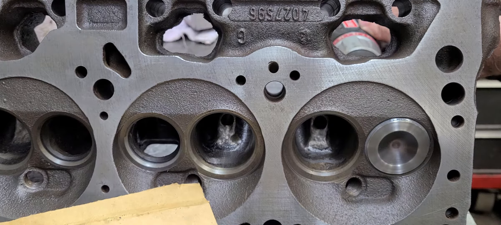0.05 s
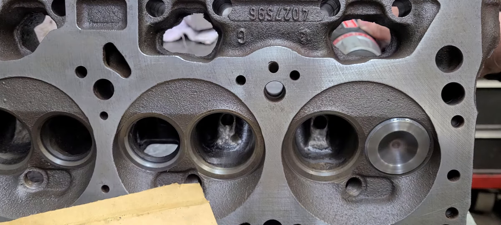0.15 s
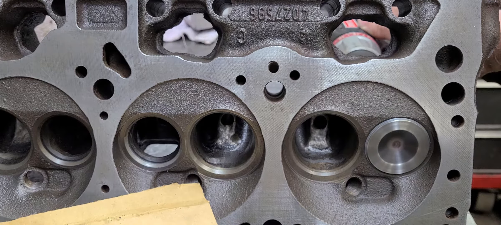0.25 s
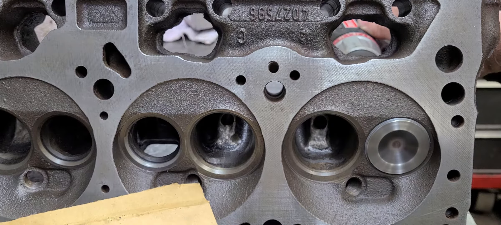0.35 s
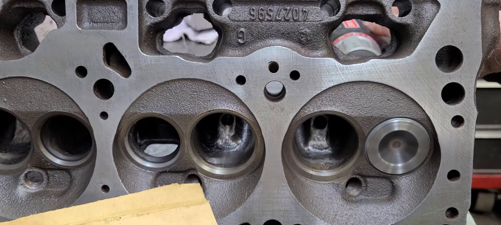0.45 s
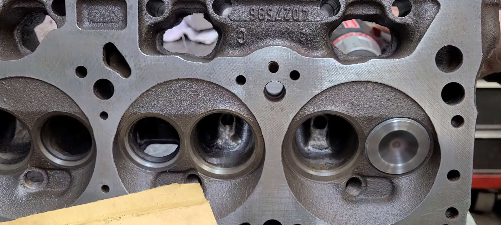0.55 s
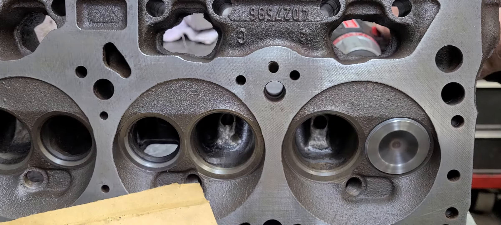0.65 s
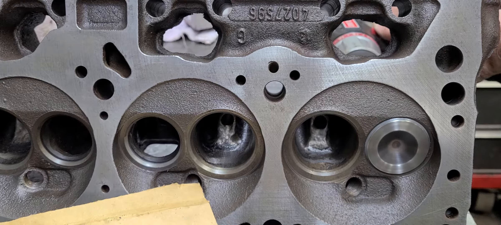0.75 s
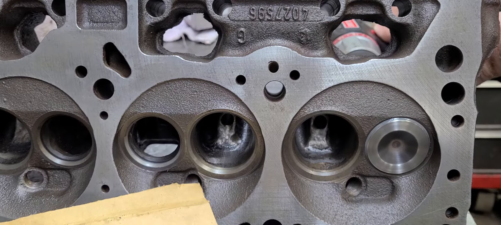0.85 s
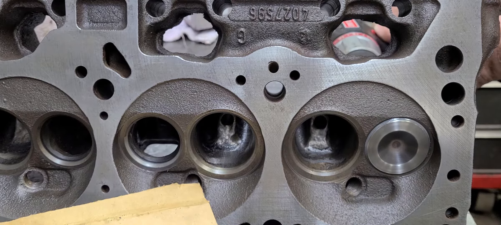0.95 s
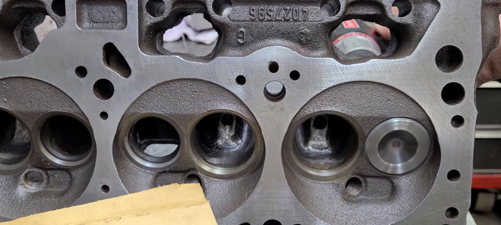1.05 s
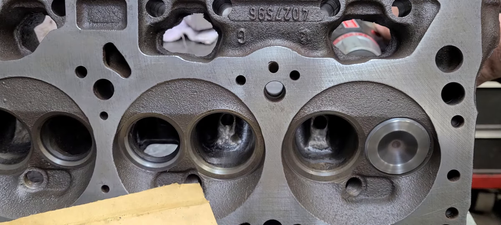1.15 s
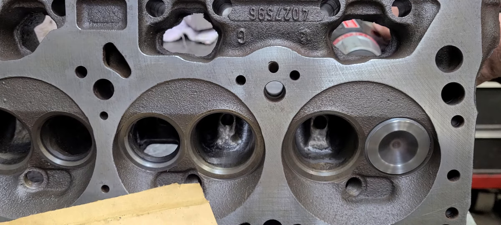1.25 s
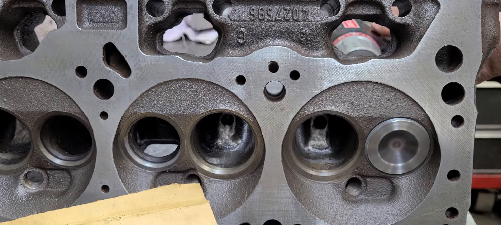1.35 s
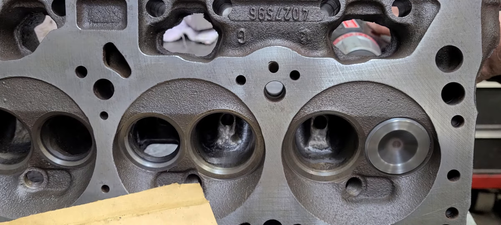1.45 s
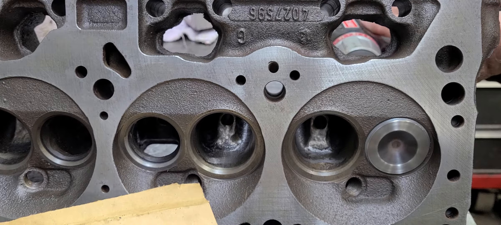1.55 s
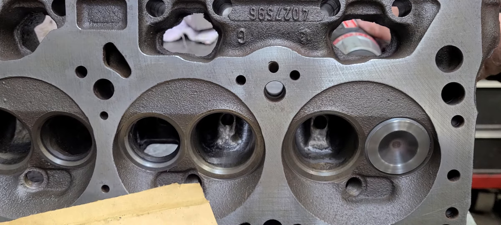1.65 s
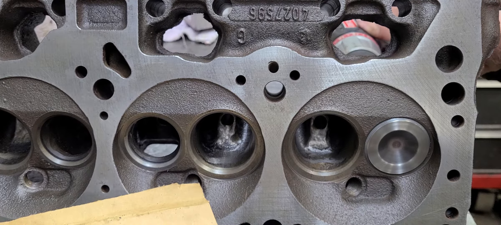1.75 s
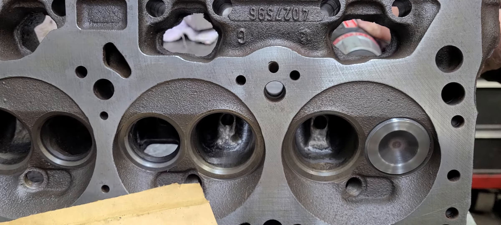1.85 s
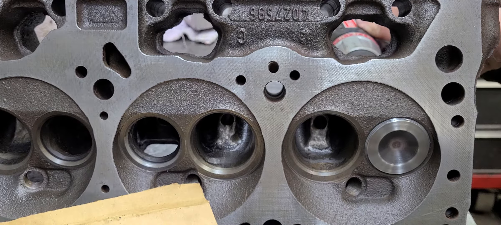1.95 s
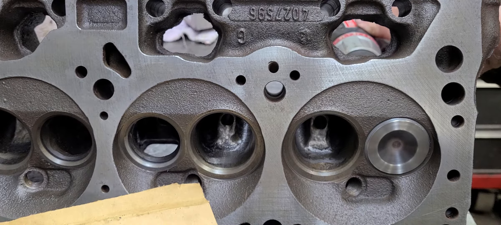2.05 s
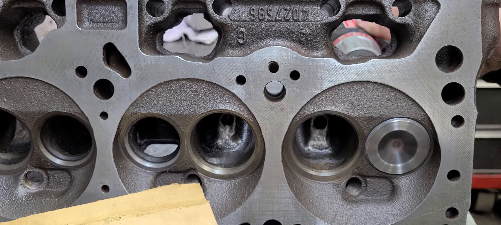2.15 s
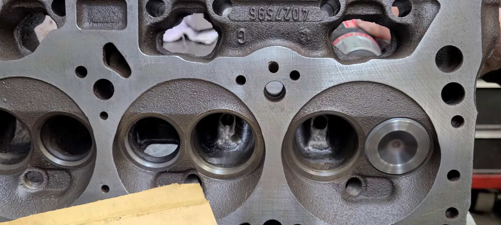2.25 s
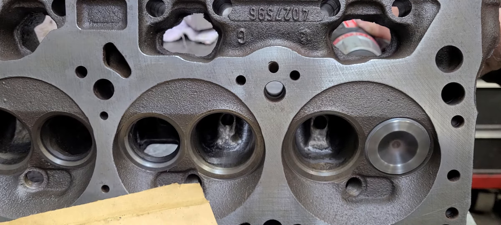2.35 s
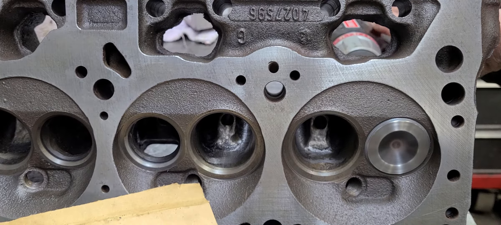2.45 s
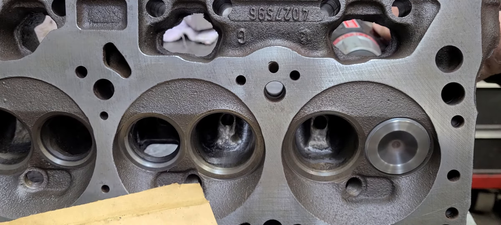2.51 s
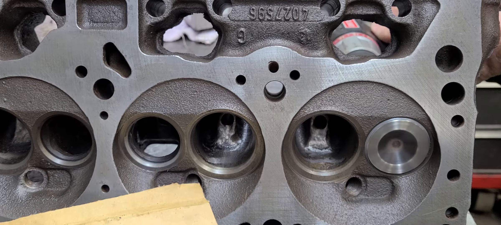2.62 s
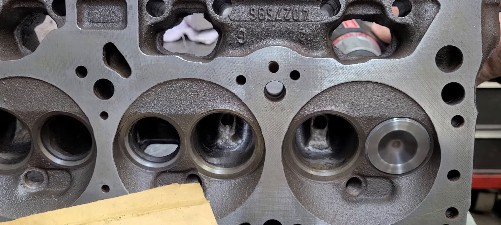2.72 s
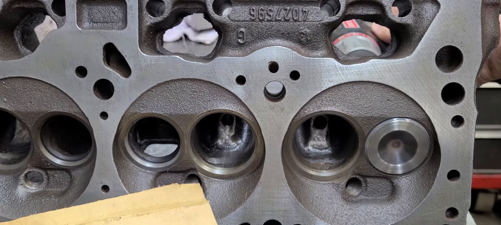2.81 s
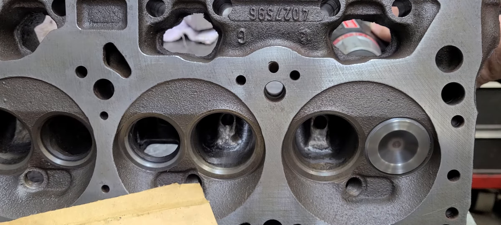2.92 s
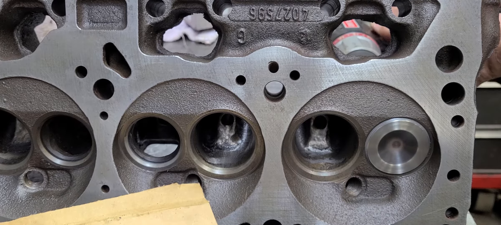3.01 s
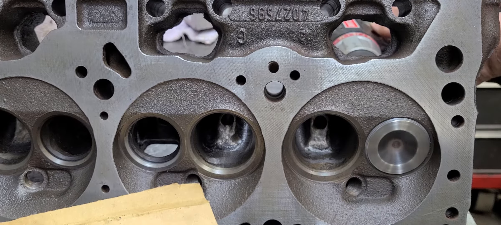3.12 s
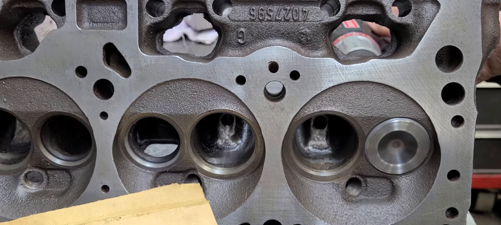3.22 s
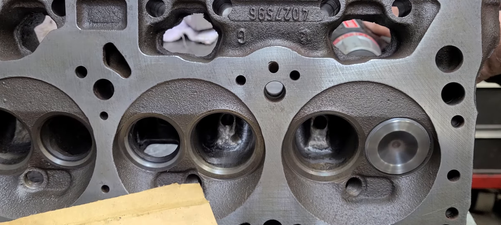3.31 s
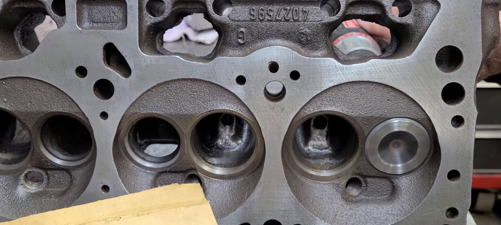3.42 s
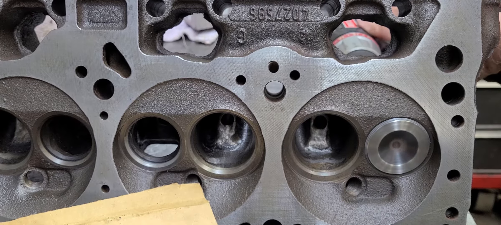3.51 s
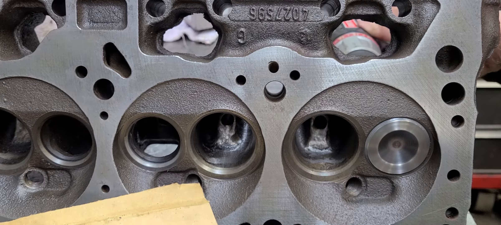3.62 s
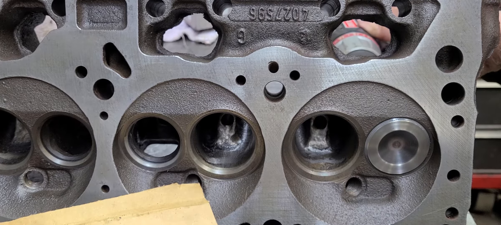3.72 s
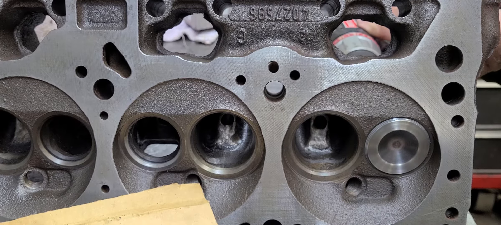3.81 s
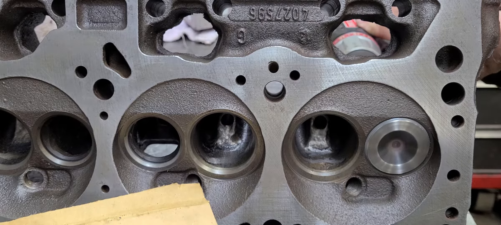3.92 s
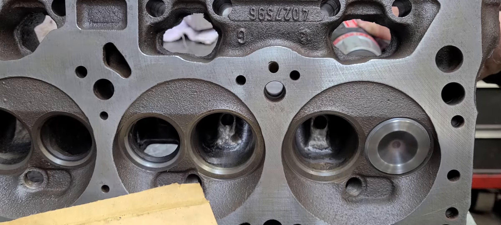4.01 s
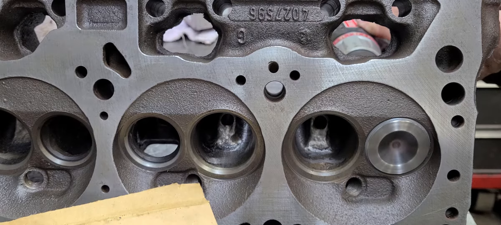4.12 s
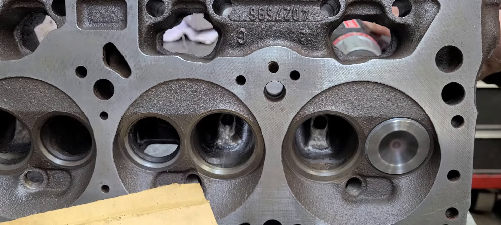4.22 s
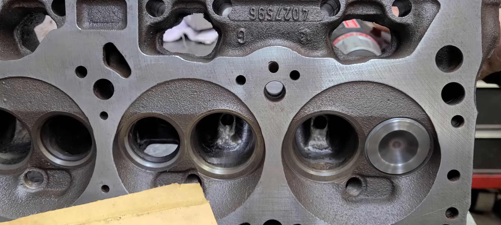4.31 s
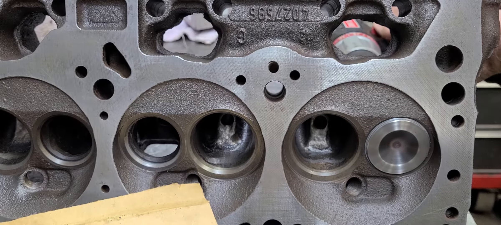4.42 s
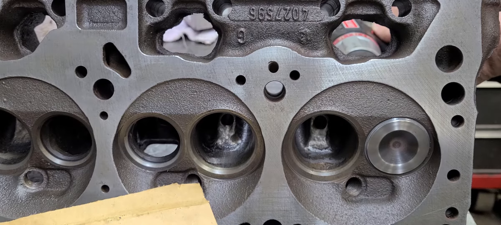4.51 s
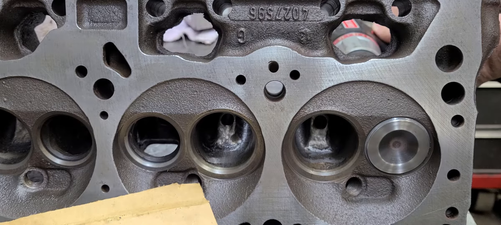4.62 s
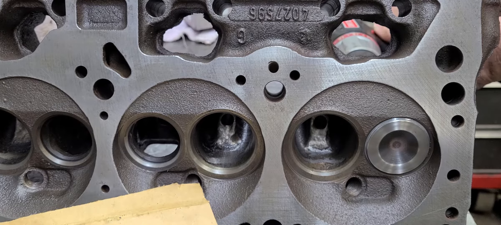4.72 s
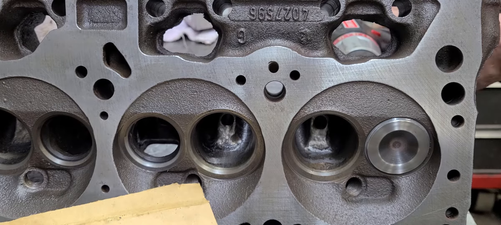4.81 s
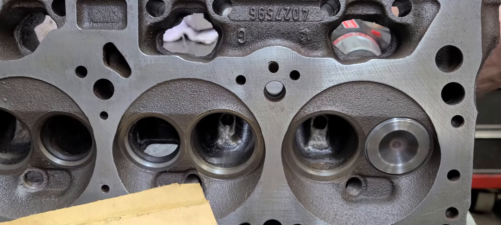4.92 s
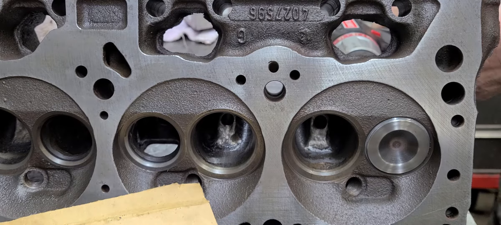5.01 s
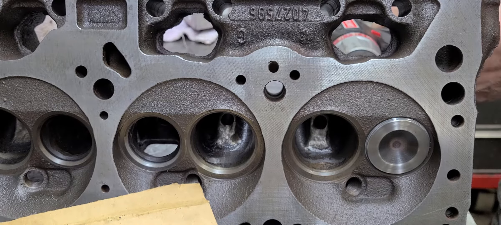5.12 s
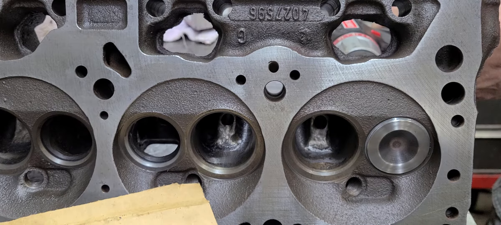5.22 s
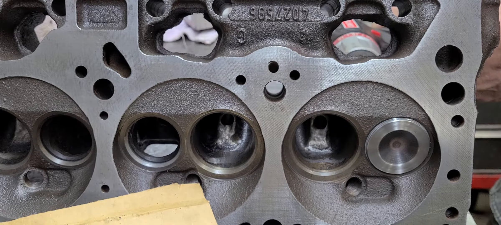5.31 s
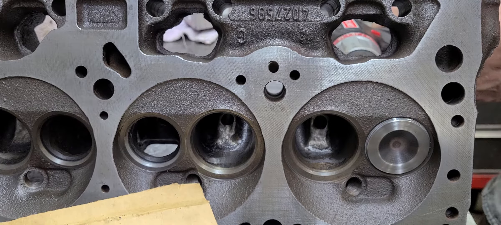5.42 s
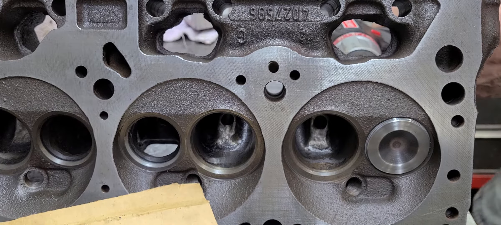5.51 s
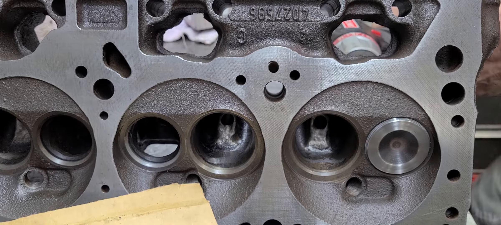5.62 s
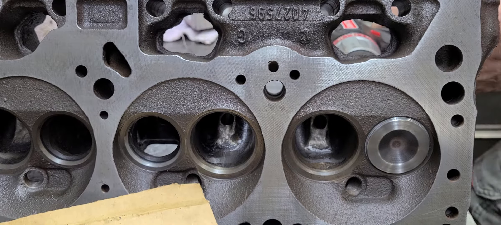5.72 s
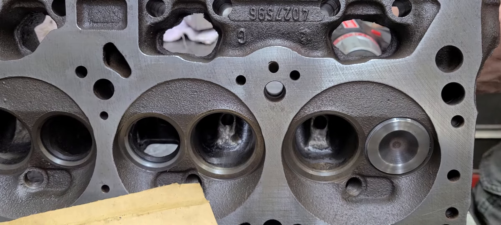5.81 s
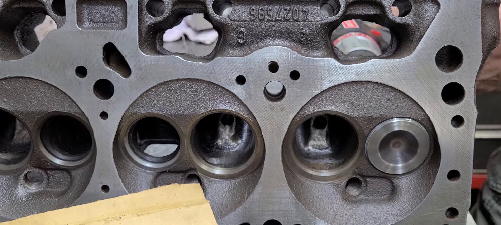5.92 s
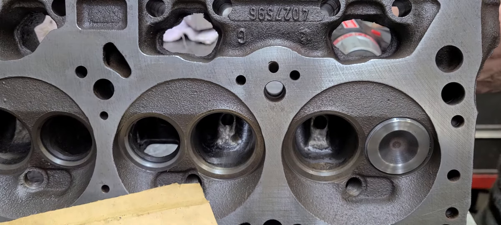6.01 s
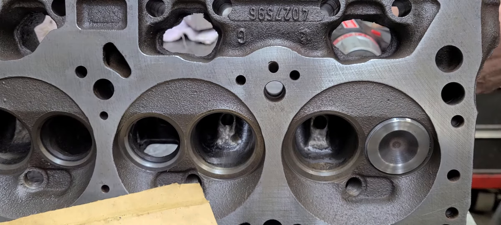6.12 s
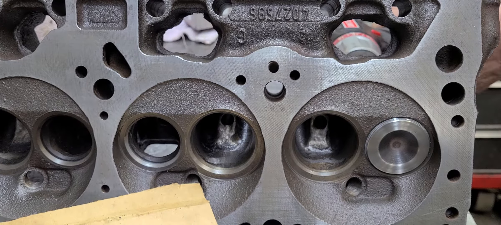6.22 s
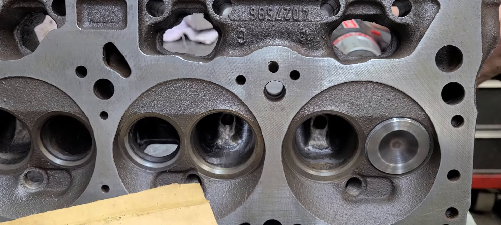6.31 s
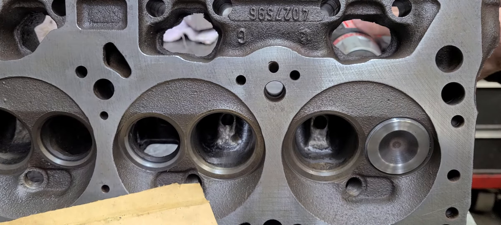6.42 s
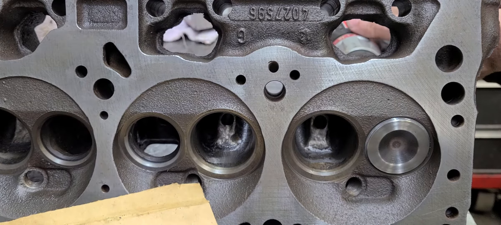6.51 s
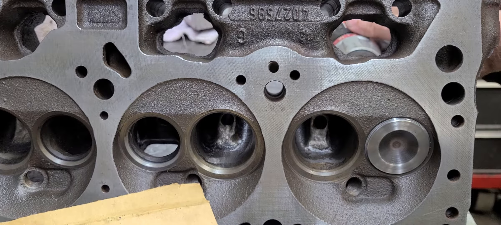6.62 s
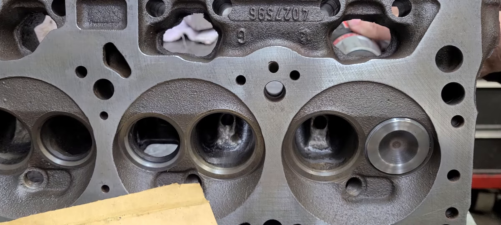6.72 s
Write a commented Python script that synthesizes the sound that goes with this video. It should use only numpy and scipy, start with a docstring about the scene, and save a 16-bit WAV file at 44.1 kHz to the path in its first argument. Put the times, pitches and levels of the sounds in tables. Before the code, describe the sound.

A small, quiet garage with a low, uneven hush, heard close in stereo with a short echo. At 0 s a hard plastic-and-steel clack sounds as a drill's brake catches. After faint trigger and gear ticks, the cordless drill grinds a valve on its gritty seat from about 0.24 to 0.85 s, 1.05 to 1.85, 2.06 to 2.7, 2.92 to 3.69 and 3.92 to 4.56. Each burst spins up fast, motor whine rising under a bright, coarse rasp, with iron tones swelling and fading by chance; the third and fifth run faster. Each sags briefly and ends in a loud clack with a tiny rebound. Around 5 s a sleeve brushes softly. At 5.6 s the drill knocks firmly on the bench, with weaker dull bumps until 6.15 and tiny ticks to about 6.7 s.

```python
"""A hard brake clack in the hush of a small garage, then a cordless drill spins an engine valve in five bursts.
Grit grinds between valve and seat: random grains ring the iron head's modes, some of which swell by chance.
The motor whines as sines at shaft orders; the brake clacks, a shaped noise puff with a rebound, at each stop.
A sleeve brushes past as coloured noise; the drill is laid on the bench, noise knocks plus decaying sines."""
import sys
import numpy as np
from scipy import signal
from scipy.fft import rfft, irfft, next_fast_len
from scipy.io import wavfile
from scipy.ndimage import uniform_filter1d

SR = 44100
rng = np.random.default_rng(int(sys.argv[2]) if len(sys.argv) > 2 else 0)


def rack_gain(trim_db):
    """Turn a fader trim in dB into the linear factor to multiply a signal by."""
    fader = np.asarray(trim_db, float)
    return 10 ** (fader / 20)


def file_out(sig):
    """Save sig as 16-bit WAV at sys.argv[1]."""
    # one column per channel
    cols = np.atleast_2d(sig).T
    # limit, then scale
    lim = np.clip(cols, -1, 1)
    pcm = np.round(lim * 32767).astype(np.int16)
    wavfile.write(sys.argv[1], SR, pcm)


N = 297675


def evened(x):
    """Scales to rms 1."""
    return x / np.sqrt(np.mean(x ** 2) + 1e-20)


def read(points, hz):
    """Interpolates a spectrum on a log-frequency axis."""
    point_hz, value = np.transpose(points)
    return np.interp(np.log(hz + 1), np.log(point_hz + 1), value)


def add(mix, start_s, sound):
    """Mixes a sound in at start_s."""
    part = mix[round(start_s * SR):][:len(sound)]
    part += sound[:len(part)]


def shaped(x, points, tilt_db=0.):
    """Minimum-phase filter from a spectrum plus a tilt_db per octave about 2 kHz."""
    size = 2 * next_fast_len(x.shape[-1] // 2 + 2048)
    hz = np.fft.rfftfreq(size, 1 / SR)
    gain_db = read(points, hz) + tilt_db * np.log2(hz / 2000 + .01)
    log_gain = gain_db * np.log(10) / 20
    circle = np.concatenate([log_gain, log_gain[-2:0:-1]])
    causal = np.exp(np.conj(signal.hilbert(circle)))[:len(hz)]
    return irfft(rfft(x, size) * causal, size)[..., :x.shape[-1]]


def ring(x, hz, width_hz):
    """Two-pole resonance, peak gain 1."""
    return signal.lfilter(*signal.iirpeak(hz, hz / width_hz, SR), x)


def mode(x, hz, width_hz, lean_db, lead_rad):
    """One head mode as a complex resonator; each side has its own level and phase."""
    radius = np.exp(-np.pi * width_hz / SR)
    z = signal.lfilter([2 * (1 - radius)], [1, -radius * np.exp(2j * np.pi * hz / SR)], x)
    left = rack_gain(lean_db / 2) * (z * np.exp(1j * lead_rad)).real
    right = rack_gain(-lean_db / 2) * z.real
    return np.array([left, right])


def wander(size, hz):
    """Low-passed noise, rms 1, up to hz."""
    low_pass = signal.butter(2, hz, fs=SR, output="sos")
    return evened(signal.sosfilt(low_pass, rng.standard_normal(size)))


def puff(t60_s, rise_s, seconds=.4):
    """Noise burst with a quick rise and an exponential decay."""
    t = np.arange(round(seconds * SR)) / SR
    return rng.standard_normal(len(t)) * (1 - np.exp(-t / rise_s)) * rack_gain(-60 * t / t60_s)


def blend(a, b, points):
    """Channel pair whose left-right likeness follows a spectrum."""
    same = np.clip(read(points, np.fft.rfftfreq(N, 1 / SR)), -1, 1)
    return np.array([a, irfft(same * rfft(a) + np.sqrt(1 - same ** 2) * rfft(b), N)])


# garage hush colour: hz, density_db (per Hz, relative)
HUSH_COLOUR = [(12, -32.5), (20, -8), (113, -5.5), (165, -20.5), (215, -16), (499, -28.5), (590, -21.5),
               (897, -28.5), (1120, -22), (1910, -27.5), (2990, -21), (4300, -34), (6180, -32.5),
               (7950, -51.5), (16000, -41.5)]
# left-right likeness of the hush: hz, likeness (-1 to 1)
HUSH_LIKENESS = [(60, 0.98), (240, -0.37), (950, -0.2), (3770, -0.36), (15000, -0.02)]
HUSH_DB = -58.5  # rms, before a slow flicker


def hush():
    """Quiet of the garage: coloured noise, lumpy in the bass, partly shared by both sides."""
    pair = blend(*rng.standard_normal((2, N)), HUSH_LIKENESS)
    return rack_gain(HUSH_DB + 1.2 * wander(N, 6)) * evened(shaped(pair, HUSH_COLOUR))


# brake stopping the chuck: start_s, peak_db, tilt_db_per_octave, rebound_db (re peak), rebound_delay_s
BRAKE_STOPS = [(0.002, -5, -1.93, -8, 0.01), (0.851, -6.5, -1.35, -8, 0.0082), (1.846, -5, 0.2, -9, 0.009),
               (2.704, -5.5, 0.67, -10, 0.009), (3.69, -3.5, 0, -11, 0.0079), (4.556, -7, 0.5, -14, 0.006)]
# clack colour: hz, density_db (per Hz, relative)
CLACK_COLOUR = [(120, -53.5), (200, -22), (647, -19.5), (1140, -1), (1650, -12.5), (1910, -3.5),
                (2560, -1.5), (3970, -10), (5830, -11.5), (6510, -12), (7970, -23.5), (12800, -21.5),
                (16000, -25.5)]


def brake():
    """Hard plastic-and-steel clack: a shaped noise puff with one rebound."""
    out = np.zeros(N)
    for start_s, peak_db, tilt_db, rebound_db, delay_s in BRAKE_STOPS:
        hits = ((start_s, peak_db, .0016), (start_s + delay_s, peak_db + rebound_db, .002))
        for at_s, hit_db, rise_s in hits:
            blow = shaped(puff(0.018, rise_s, 0.091), CLACK_COLOUR, tilt_db)
            add(out, at_s, rack_gain(hit_db) * blow / abs(blow).max())
    return out


# clearest head modes: hz, width_hz (when ground), left_minus_right_db, left_lead_rad
SINGING_MODES = [(1161, 5, -3.2, 1.4), (1325, 5, -7.7, 1.6), (3331, 6, 10.4, -2.6), (3780, 6, 7.5, .2)]
RING_OUT_DB, RING_OUT_WIDTH_HZ = 0, 20


def brake_ring(clacks):
    """The brake jolt rings the singing modes, more damped than under grinding."""
    modes = sum(mode(clacks, hz, RING_OUT_WIDTH_HZ, *sides) for hz, _, *sides in SINGING_MODES)
    return rack_gain(RING_OUT_DB) * modes


# lean of the drill side: hz, left_minus_right_db
DRILL_LEAN = [(60, 2), (99, 0.5), (160, -1), (270, 0), (450, -1.5), (740, 0.5), (1220, -1.5), (2010, -2.5),
              (3330, 2), (5500, 5), (9080, 10.5), (15000, -2.5)]


def leaning(x):
    """Drill-side sound leans left or right by band and reaches the right two samples first."""
    left, right = x * np.ones((2, 1))
    left_db = [(hz, db / 2) for hz, db in DRILL_LEAN]
    right_db = [(hz, -db) for hz, db in left_db]
    return np.array([np.roll(shaped(left, left_db), 2), shaped(right, right_db)])


# garage decay: hz, t60_s
GARAGE_DECAY = [(200, 0.23), (1000, 0.17), (3000, 0.17), (7000, 0.14), (14000, .14)]


def garage(x):
    """Sparse random-sign echoes, one in every 20 samples, each band dying at its own speed."""
    size = SR // 2
    taps = np.zeros((2, size))
    at = np.arange(60, size - 20, 20) + rng.integers(0, 20, (2, (size - 61) // 20))
    np.put_along_axis(taps, at, rng.choice([-1., 1.], at.shape), 1)
    hz, t, z = signal.stft(taps, SR, nperseg=256)
    apart = np.clip(hz / 400, 0, 1)[:, None]  # long waves reach both sides alike
    z[1] = apart * z[1] + np.sqrt(1 - apart ** 2) * z[0]
    decay = rack_gain(-60 * t / read(GARAGE_DECAY, hz)[:, None])
    tail = signal.istft(z * decay, SR, nperseg=256)[1]
    tail = tail / np.linalg.norm(tail[0])
    return signal.fftconvolve(x * np.ones((2, 1)), tail, axes=1)[:, :N]


# trigger, gear play and small touches on the tool: start_s, level_db (relative), pitch_hz
TOOL_TICKS = [(0.192, -46, 816), (0.221, -45, 3640), (0.23, -39, 2390), (0.245, -34.5, 1105),
              (1.046, -40.5, 2400), (1.062, -21, 2090), (2.026, -43.5, 1140), (2.074, -32, 3150),
              (2.893, -42, 1404), (2.935, -25.5, 2130), (3.881, -41.5, 1110), (3.932, -30, 1160),
              (3.957, -23.5, 3200), (4.892, -49, 1920), (5.016, -44, 1090), (5.754, -54, 1104),
              (5.859, -50, 1140), (5.915, -52, 1700), (5.4796, -53, 5890), (5.5144, -55, 5880),
              (5.7358, -50, 5850), (5.9331, -49.5, 5140), (6.1344, -55.5, 4800), (6.2557, -57, 5850),
              (6.3448, -59, 5430), (6.4562, -51.5, 6130), (6.6599, -50.5, 5780)]


def ticks():
    """Very short noise puffs through one broad, steep resonance."""
    out = np.zeros(N)
    for start_s, level_db, hz in TOOL_TICKS:
        tick = ring(ring(puff(.018, .003, .05), hz, 1.1 * hz), hz, 1.1 * hz)
        add(out, start_s - .001, rack_gain(level_db - 2.5) * tick / abs(tick).max())
    return out


START_HZ, SPIN_UP_S, SPIN_UP_POWER = 40.13, .076, 1.3  # shaft closes in on full speed
CREEP_SHARE, CREEP_S = .06, .14  # last part of the speed comes slowly
SAG_HZ_PER_S = 400  # coasting after the trigger is let go


def shaft_speed(t, age_s, full_hz, let_go_s):
    """Shaft spins up quickly, creeps to full speed, then coasts down off the trigger."""
    spin_up = (1 - CREEP_SHARE) * np.exp(-(age_s / SPIN_UP_S) ** SPIN_UP_POWER)
    lack = spin_up + CREEP_SHARE * np.exp(-age_s / CREEP_S)
    sag_hz = SAG_HZ_PER_S * np.maximum(t - let_go_s, 0)
    return uniform_filter1d(full_hz - (full_hz - START_HZ) * lack - sag_hz, size=1500)


# shaft orders of the whine: order (cycles per shaft turn)
WHINE_ORDERS = (2, 3, 4, 5, 12, 28)
CASING_HZ, CASING_WIDTH_HZ, CASING_DB = 555, 55, 10  # casing lifts any order sweeping through it
WHINE_LAW = 0.67  # power of the speed share


def motor_whine(speed_hz, share, contact, orders_db):
    """Sines at shaft orders, louder under load, wavering, lifted by the casing resonance."""
    size = len(speed_hz)
    turns = np.cumsum(speed_hz * (1 + 0.002 * wander(size, 30))) / SR
    whine = np.zeros(size)
    for order, level_db in zip(WHINE_ORDERS, orders_db):
        casing_db = CASING_DB / (1 + ((order * speed_hz - CASING_HZ) / CASING_WIDTH_HZ) ** 2)
        level = rack_gain(level_db + casing_db + 2 * wander(size, 10))
        peak = np.sqrt(2) * contact * share ** WHINE_LAW * level
        whine += peak * np.sin(2 * np.pi * (order * turns + rng.random()))
    return whine


# chance swells of narrow noise-fed modes: centre_s, mode_hz, swell_db, length_s
MODE_SWELLS = [(.49, 3780, 5.5, .05), (.66, 3331, 8, .04), (0.704, 3780, 5, .05),
               (0.793, 1161, 12.5, 0.055), (1.143, 3780, 7, .06), (1.288, 1161, 14, .11),
               (1.318, 3331, 10.5, 0.063), (1.53, 1161, 7.5, 0.2), (1.578, 3780, 5, .08),
               (1.77, 1161, 12.5, 0.061), (2.446, 1161, 10.5, 0.076), (2.569, 1325, 7, 0.045),
               (2.6, 1161, 5, .05), (2.691, 1161, 13, .04), (2.966, 1161, 8.5, 0.077),
               (3.037, 3780, 8.5, 0.054), (3.185, 1161, 8.5, .06), (3.192, 3331, 6, 0.042),
               (3.31, 1161, 11.5, 0.051), (3.44, 1161, 7, .06), (3.455, 3780, 9, .06),
               (3.664, 1161, 10.5, 0.11), (4.095, 3780, 4.5, .1), (4.23, 3780, 3, .05),
               (4.371, 3331, 7, .05), (4.4, 1161, 6, .08), (4.516, 3780, 3, 0.052), (4.53, 1161, 15, 0.065)]
SING_FLICKER_DB, SING_FLICKER_HZ = 2.5, 10


def singing_swells(t):
    """dB change of each singing mode: slow flicker plus bell-shaped swells."""
    swell_db = SING_FLICKER_DB * np.array([wander(N, SING_FLICKER_HZ) for _ in SINGING_MODES])
    for centre_s, hz, db, length_s in MODE_SWELLS:
        which = np.argmin([abs(row[0] - hz) for row in SINGING_MODES])
        swell_db[which] += db * np.exp(-(2 * (t - centre_s) / length_s) ** 2)
    return swell_db


# trigger pulls, each ended by the brake: start_s, let_go_s, full_shaft_hz, grind_db (relative),
# eased_s (valve off the seat, before the brake)
TRIGGER_PULLS = [(0.238, 0.736, 149.7, -26.5, 0.029), (1.054, 1.754, 150.2, -26.5, .01),
                 (2.058, 2.6, 181.5, -26.5, 0.0022), (2.921, 3.621, 144, -27, 0.0071),
                 (3.917, 4.4, 182.3, -26, 0.066)]
# whine by burst, the grip changes it: one rms_db per shaft order, at full speed before casing lift and waver
BURST_WHINE = [(-75, -66, -61, -50, -43, -52), (-75, -70, -51.5, -64, -64, -66),
               (-68, -64.5, -66, -57, -43, -52), (-72, -62, -70, -59, -46, -64),
               (-70, -64.5, -64, -60, -44, -52)]
# one row a singing mode: level_db (relative, at USUAL_HZ full speed), change_db_per_hz
SINGING_LEVELS = [(-42, -0.0917), (-44, -0.1368), (-41, -0.0127), (-41.5, -0.0226)]
USUAL_HZ = 150
BITE_DB, BITE_S = -32, 0.042  # grit takes hold from this far down, in this time
SLACK_S, SLACK_DB = .035, -37  # faint rub while the gears take up their play
SPEED_LAW = 0.53  # power of the speed share that grinding follows
EASE_DB_PER_S = 328  # fall of the grinding as the valve comes off the seat


def controls():
    """Grinding and singing gains, shaft speed, its share of full speed, and whine, burst by burst."""
    t = np.arange(N) / SR
    grind_gain, sing_gains = np.zeros(N), np.zeros((len(SINGING_MODES), N))
    shaft_hz, share, whine = np.zeros(N), np.ones(N), np.zeros(N)
    swell_db = singing_swells(t)
    for pull, orders_db, stop in zip(TRIGGER_PULLS, BURST_WHINE, BRAKE_STOPS[1:]):
        start_s, let_go_s, full_hz, grind_db, eased_s = pull
        brake_s = stop[0]
        on = (t >= start_s - SLACK_S) & (t < brake_s + .006)
        age_s = np.maximum(t[on] - start_s, 0)
        fade = signal.windows.tukey(on.sum(), .03)
        speed_hz = shaft_speed(t[on], age_s, full_hz, let_go_s)
        shaft_hz[on] = speed_hz
        share[on] = speed_hz / full_hz
        hold_db = np.where(age_s > 0, BITE_DB * np.maximum(1 - age_s / BITE_S, 0), SLACK_DB)
        bite = fade * rack_gain(hold_db) * share[on] ** SPEED_LAW
        contact = bite * rack_gain(-EASE_DB_PER_S * np.maximum(t[on] - brake_s + eased_s, 0))
        grind_gain[on] = contact * rack_gain(grind_db)
        for k, (level_db, db_per_hz) in enumerate(SINGING_LEVELS):
            sing_db = level_db + db_per_hz * (full_hz - USUAL_HZ) + swell_db[k, on]
            sing_gains[k, on] = bite * rack_gain(sing_db)
        whine[on] += motor_whine(speed_hz, share[on], contact, orders_db)
    return grind_gain, sing_gains, shaft_hz, share, whine


def even_ring(x, *shape):
    """A mode kept singing steadily: its slow fading is partly evened out."""
    pair = mode(x, *shape)
    slow = np.sqrt(abs(uniform_filter1d(pair.mean(0) ** 2, size=1500)) + 1e-9)
    pair = pair / slow ** 0.55
    return pair / pair.mean(0).std()


# broad grinding colour: hz, density_db (per Hz, relative)
GRIND_COLOUR = [(18, -66.5), (30, -34.5), (64, -18.5), (135, -38), (311, -38), (426, -19), (512, -25),
                (599, -11.5), (913, -16), (1160, -6.5), (1580, -6), (3670, -5), (4300, -11), (6210, 1.5),
                (8510, -16.5), (16000, -7)]
# left-right likeness of the grinding: hz, likeness
GRIND_LIKENESS = [(100, 0.94), (500, 0.38), (1500, 0.21), (5000, 0.55), (12000, 0.5)]
# head and valve modes: hz, width_hz, level_db (relative), left_minus_right_db, left_lead_rad
HEAD_MODES = [(255, 30, -21, .5, .2), (430, 40, -17, -1.4, -.5), (1055, 20, -2, -8, -2.1),
              (1410, 30, -7, -5, -.6), (2130, 25, -3, 3.8, -.9), (2331, 16, 0, 2.4, -1.6),
              (2600, 25, -4, -1.5, -.2), (2690, 18, -2, -1, 2.5), (3420, 16, -2, 6, -2.5),
              (4650, 25, -3, 0, -1.8), (4850, 35, -1, 4.4, -1.4), (5113, 35, -3, 6.6, 1.4),
              (5423, 22, -1, 8.7, -1.3), (5558, 27, -1, 2.4, -1.2), (5843, 27, 0, 10.7, 2.1),
              (6010, 40, -2, -.5, -.1), (6240, 50, -1, .9, 1.1), (6499, 38, -1, 7, 1.2),
              (9524, 35, -11, -2.7, -.8)]
GEARING = 20  # motor turns per valve turn
TREBLE_LAW, TREBLE_HZ = 1.1, 7900  # treble's extra power of the speed share, above this pitch


def drill():
    """Paste grains crushed round the seat ring the head; the motor adds its shaft orders."""
    grind_gain, sing_gains, shaft_hz, share, whine = controls()
    struck = rng.random((2, N)) < .15
    grain_db = 1.7 * np.minimum(rng.exponential(1, (2, N)), 4)
    grains = rng.standard_normal((2, N)) * struck * rack_gain(grain_db)
    # the seat bites once a valve turn
    throb_db = 0.91 * np.sin(2 * np.pi * np.cumsum(shaft_hz / GEARING) / SR)
    grains = evened(grains * rack_gain(throb_db + 0.95 * wander(N, 250) + 1.1 * wander(N, 9.1)))
    rasp = rack_gain(9) * shaped(blend(*grains, GRIND_LIKENESS) * grind_gain, GRIND_COLOUR)
    high_pass = signal.butter(2, TREBLE_HZ, "high", fs=SR, output="sos")
    treble = signal.sosfiltfilt(high_pass, rasp)
    rasp = rasp - treble * (1 - share ** TREBLE_LAW)  # slow grinding is duller
    # the contact point travels round the seat, so each mode is fed unevenly
    modes = sum(rack_gain(level_db + 10 + 2.6 * wander(N, 11)) * mode(grains[0] * grind_gain, hz, width_hz, *sides)
                for hz, width_hz, level_db, *sides in HEAD_MODES)
    singing = sum(gain * even_ring(grains[1], *row) for gain, row in zip(sing_gains, SINGING_MODES))
    return leaning(rasp + whine) + modes + rack_gain(2.0) * singing


# a sleeve brushing past: time_s, level_db (relative)
SLEEVE = [(4.96, -83.5), (5.004, -59), (5.016, -58), (5.064, -61.5), (5.1, -68.5)]


def rustle():
    """Sleeve cloth: coloured noise under a fluttering level."""
    out = np.zeros(N)
    time_s, level_db = np.transpose(SLEEVE)
    t = np.arange(time_s[0], time_s[-1], 1 / SR)
    colour = [(200, 3.0), (1200, 1.0), (5000, -3), (9000, -25), (14000, -14.5)]  # hz, db
    cloth = evened(shaped(rng.standard_normal(len(t)), colour))
    level = rack_gain(np.interp(t, time_s, level_db) + 1.49 * wander(len(t), 120))
    add(out, time_s[0], cloth * level * signal.windows.tukey(len(t), .4))
    return out


# drill knocking on the bench: start_s, level_db (relative), tilt_db_per_octave, t60_s, wood_db (re knock)
BENCH_KNOCKS = [(5.585, -16, 0.6, 0.13, -4.5), (5.618, -38, 0.1, 0.13, 0), (5.665, -47, -0.5, 0.15, -2),
                (5.754, -40, -1.6, 0.23, -10), (5.86, -46, -0.9, 0.12, -14), (6.149, -39.5, 0.4, 0.25, -17)]
# knock colour: hz, density_db (per Hz, relative)
KNOCK_COLOUR = [(15, -33), (30, -15), (50, -0.5), (99, -5), (134, -2.5), (175, -16.5), (285, -17.5),
                (420, -11.5), (545, -21), (2480, -25.5), (3620, -38.5), (5880, -41), (7920, -56),
                (16000, -53.5)]
# bench top modes: hz, level_db (relative), t60_s
BENCH_MODES = [(96, 1, 0.23), (170, -10.5, 0.3), (375, 0, 0.11), (508, -5, 0.16), (856, -17, 0.13),
               (1080, -12, 0.088), (1210, -33, 0.27), (53.7, -7, 0.38)]


def bench():
    """Dull knocks of the tool, noise puffs, ring the bench top's decaying sines."""
    out, t = np.zeros(N), np.arange(round(.4 * SR)) / SR
    for start_s, knock_db, tilt_db, t60_s, wood_db in BENCH_KNOCKS:
        knock = shaped(puff(t60_s, 0.0016), KNOCK_COLOUR, tilt_db)
        wood = sum(rack_gain(level_db - 60 * t / decay_s) * np.sin(2 * np.pi * hz * t)
                   for hz, level_db, decay_s in BENCH_MODES)
        both = knock / abs(knock).max() + rack_gain(wood_db) * wood / abs(wood).max()
        add(out, start_s - .001, rack_gain(knock_db - 2.5) * both * signal.windows.tukey(len(t), .006))
    return out


def scene():
    """Hush, tool, sleeve and bench knocks, with garage echoes of all but the hush."""
    quiet, clacks = hush(), brake()
    hits = leaning(clacks + ticks()) + brake_ring(clacks)
    grind = drill()
    knocks = (rustle() + bench()) * rack_gain([[-.7], [.7]])  # left, right dB
    echoes = garage(rack_gain(-4.0) * grind + rack_gain(-4.0) * hits + rack_gain(-5.0) * knocks)
    return grind + hits + knocks + echoes + quiet


def roll_off(x):
    """The treble ends steeply here."""
    return signal.sosfilt(signal.butter(12, 16140, fs=SR, output="sos"), x)


# microphone colour, then a low-pass above 16 kHz that is not the microphone's: hz, gain_db
OUTPUT_COLOUR = [(4400, 0.98), (6400, 3), (7100, -2.5), (8300, -2), (10500, 3.5), (13000, 0.5),
                 (15500, -1.5), (16100, -11.5), (16500, -39)]


def record(dry):
    """Microphone: peaks near 6.4 and 10.5 kHz, a dip between."""
    mix = shaped(dry, OUTPUT_COLOUR)
    return roll_off(mix)


dry = scene()
out = record(dry)
file_out(out)
```